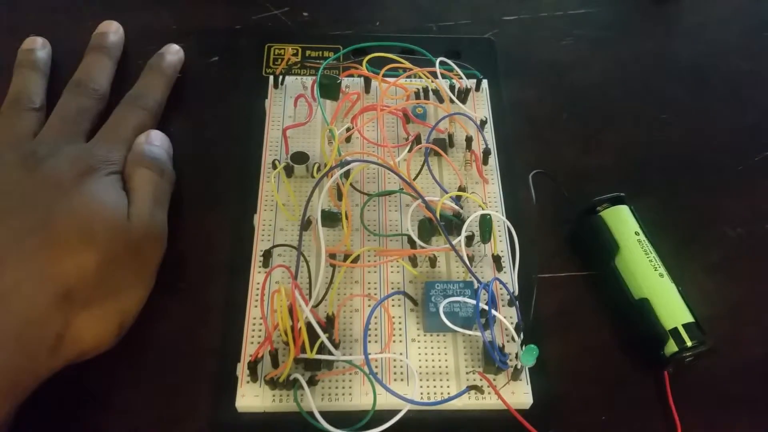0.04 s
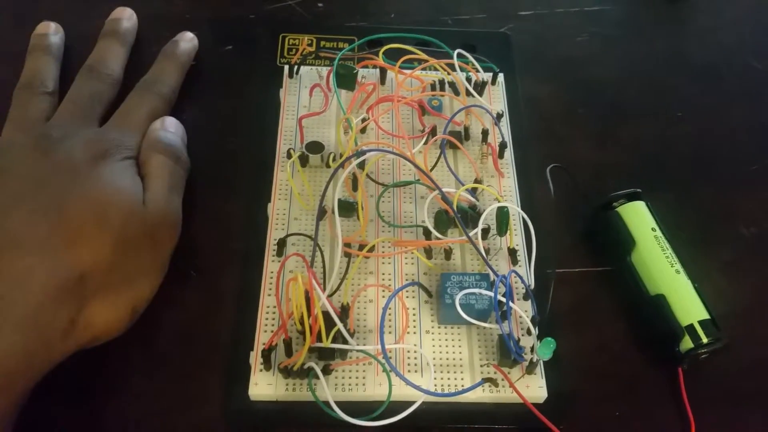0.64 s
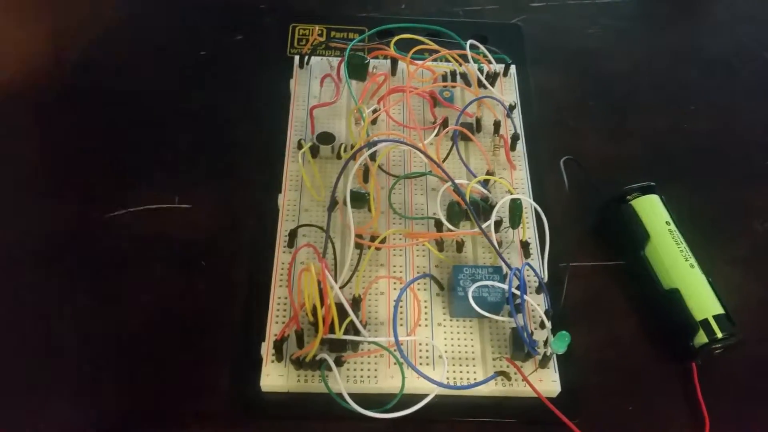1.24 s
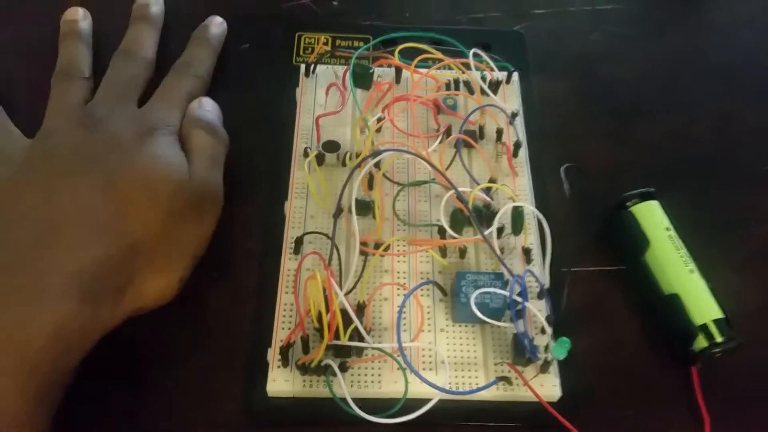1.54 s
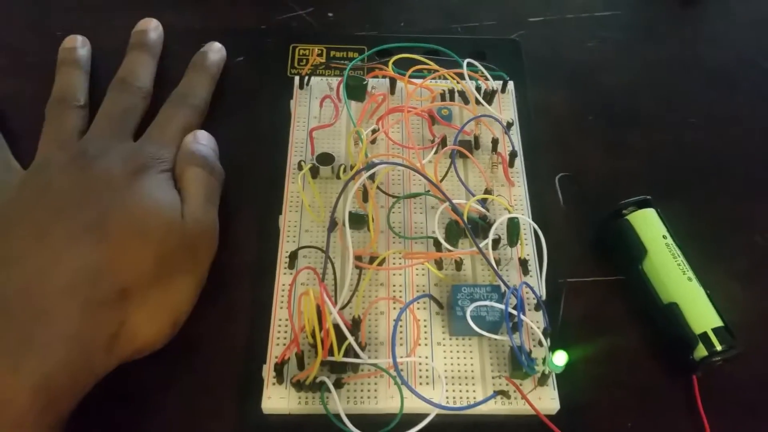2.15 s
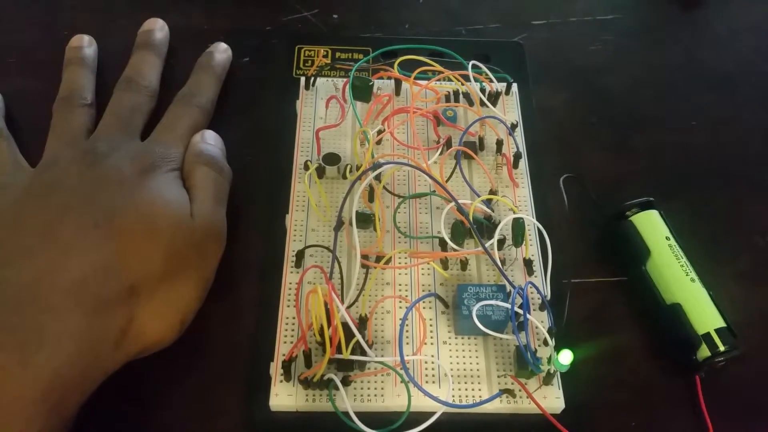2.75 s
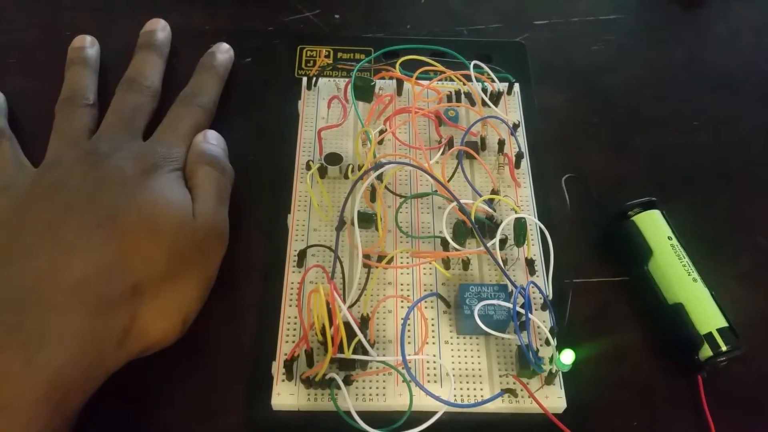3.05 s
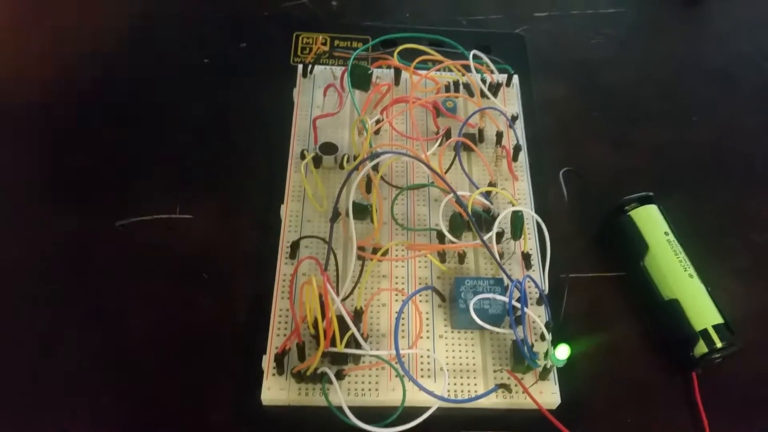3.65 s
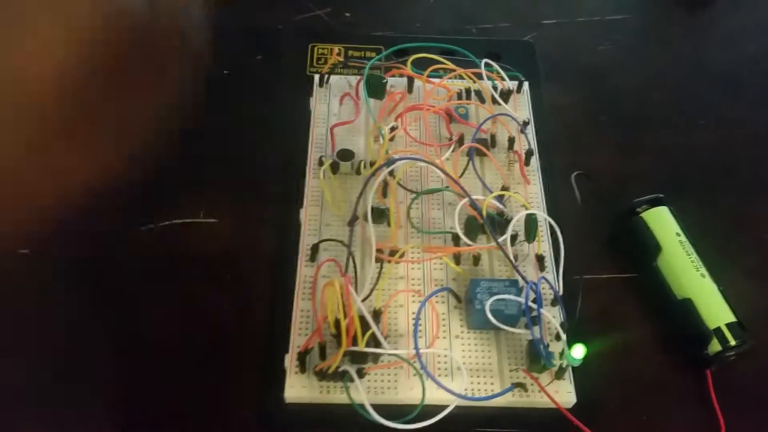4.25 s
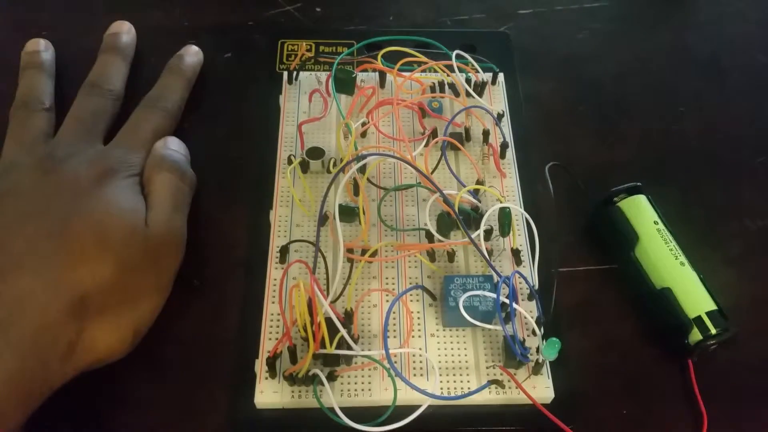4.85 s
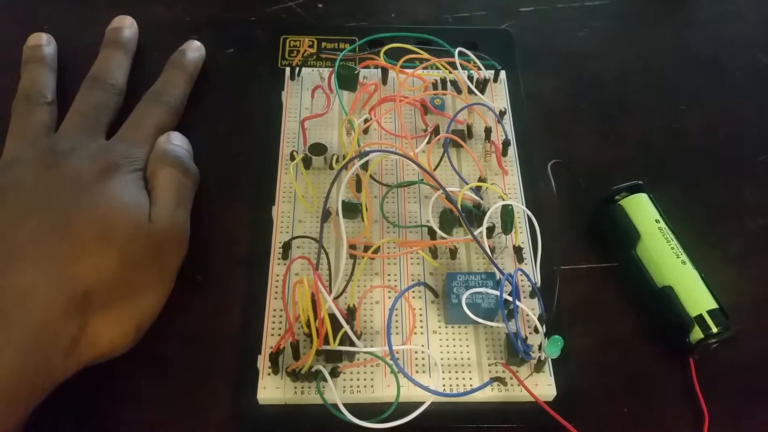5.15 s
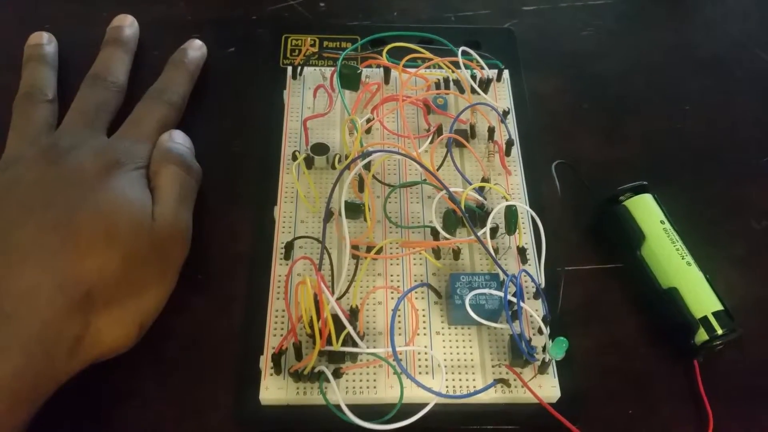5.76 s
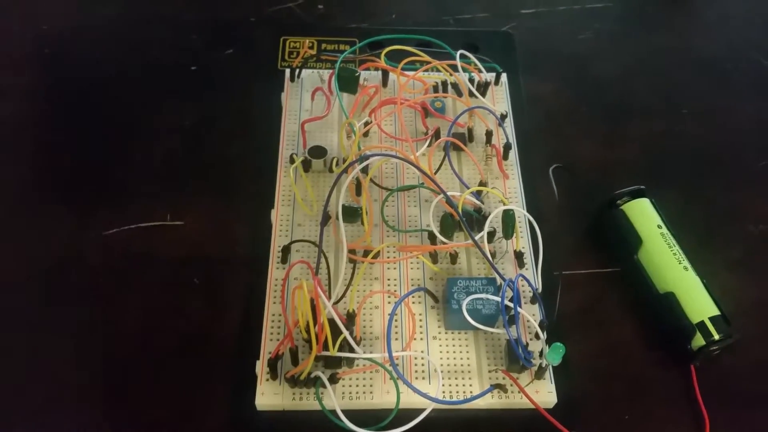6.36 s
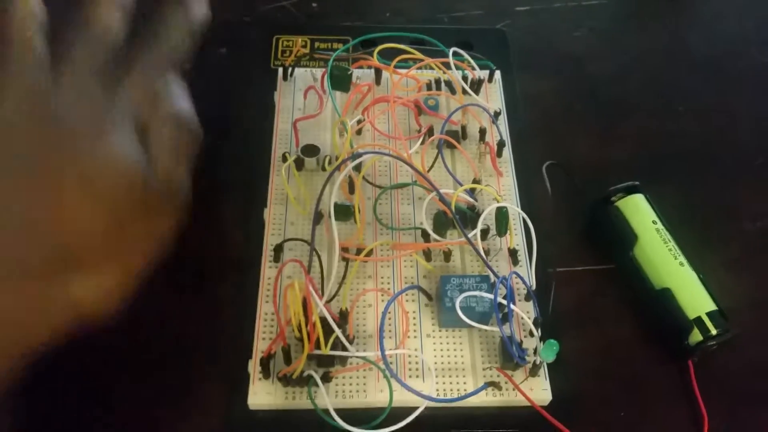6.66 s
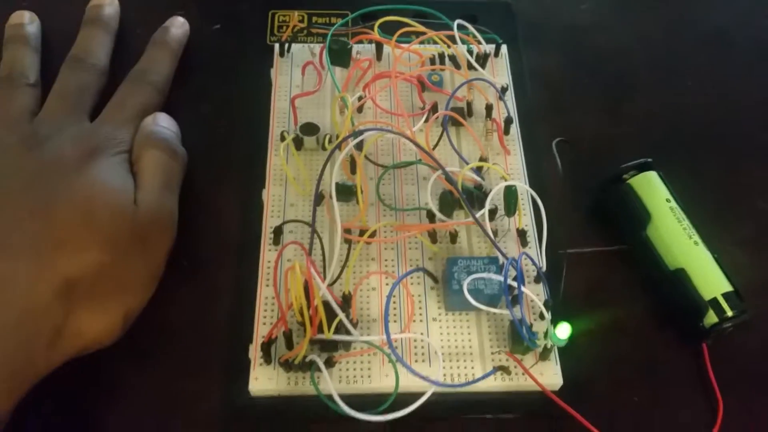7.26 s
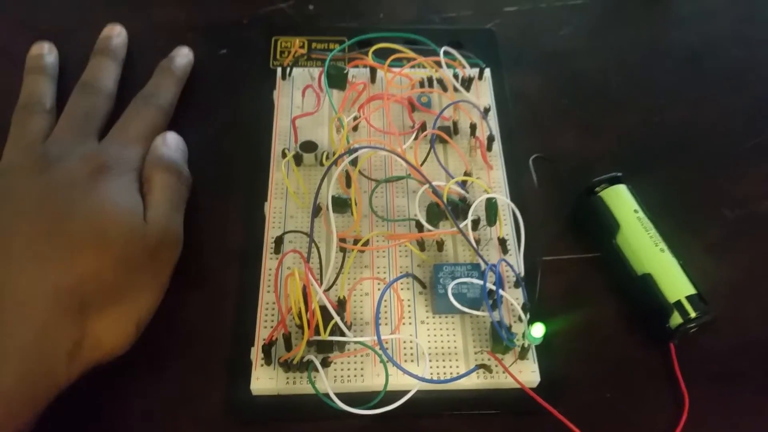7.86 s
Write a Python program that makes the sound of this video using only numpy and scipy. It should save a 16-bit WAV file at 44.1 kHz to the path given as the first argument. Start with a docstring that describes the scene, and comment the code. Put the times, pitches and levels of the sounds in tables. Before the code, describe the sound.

Faint room rumble and hiss open the scene, with soft touches of a hand on wood around 1 second. A slight sleeve swish leads into a loud flat-handed slap on a wooden table at 1.5 seconds, and another at 2. Further pairs land at 4 and 4.5 seconds, then at 6.6 and 7, the second of each a little weaker. Every slap is a close crack with a low thump, slightly left, ringing through the table and hard room for about half a second. Right after each, a loose circuit board and battery knock back down in a quick clatter. The background dips after the slaps and slowly returns. The hand shifts very softly around 3.3, 3.9, 5.1, 6 and 7.7 seconds, and a few tiny dry ticks come near 8 seconds.

```python
"""Three pairs of flat-handed claps on a wooden table that carries a small circuit, in a hard, echoing room.
The heel of the hand thumps the top, the palm shuts with a crack, and table and room ring on.
Each clap makes the loose board and battery hop and knock back down; the hand shifts softly in between.
A limiter flattens the claps, and a slow gain control ducks the room's rumble, hiss and faint hums,
then lets them creep back."""
import sys
import numpy as np
from scipy import signal
from scipy.fft import rfft, irfft, next_fast_len
from scipy.io import wavfile
from scipy.ndimage import uniform_filter1d, minimum_filter1d

SR = 44100
rng = np.random.default_rng(int(sys.argv[2]) if len(sys.argv) > 2 else 0)


def log_audio(samples):
    """Write samples as a 16-bit WAV file to the path given in sys.argv[1]."""
    # one column per channel
    frames = np.atleast_2d(samples).T
    # limit to full scale, then quantise
    limited = np.clip(frames, -1, 1)
    pcm = np.round(limited * 32767).astype(np.int16)
    wavfile.write(sys.argv[1], SR, pcm)


N = 353417

# The claps, each with its own weight and EQ:
# (time [s], force [dB], bass [dB], mids [dB], top [dB], board's air time [s], landing level [dB])
CLAP_HITS = [(1.5022, 6.5, 1.8, 2.5, 3, .0485, 5.5), (1.955, 5.5, -4, -0.3, -6, 0.051, -3),
             (4.0479, 6, 0, 0.8, -1.5, 0.054, 6), (4.5190, 3, -2, 0.4, -5, .055, -2.5),
             (6.5581, 6, 2.5, 0.7, 0, .053, 5.5), (7.0213, 1.6, .3, -1.5, 1.5, 0.063, -6.5)]


def claps():
    """The hand strikes the table, and every blow throws the loose parts into a short hop."""
    out, room = np.zeros((2, N)), reverberation(ROOM_TAIL_EQ)
    for time, force_db, bass_db, mids_db, top_db, air_s, landing_db in CLAP_HITS:
        eq = [(150, bass_db), (800, mids_db), (3200, -0.6), (8000, top_db)]
        add(out, time, gain_of(force_db) * coloured(clap(room), eq))
        for delay, db in hops(air_s):
            add(out, time + delay, gain_of(landing_db + db) * landing())
    return out


# Slapback off walls and ceiling: (delay [s], level [dB])
SLAPBACKS = [(0.0136, -6.5), (0.0216, -24.5)]


def clap(room, shared=0.65, right_lag_s=.00034):
    """One blow with its ring and echoes; landing near the same spot, claps share part of their tail."""
    direct = hand_strike()
    tail = shared * room + np.sqrt(1 - shared ** 2) * reverberation(ROOM_TAIL_EQ)
    out = gain_of(-0.68) * tail + table_ring()
    # the hand is on the left, so its sound reaches the right side later
    add(out, 0, np.array([direct[0], np.roll(direct[1], round(right_lag_s * SR))]))
    reflected = coloured(direct, [(150, -1), (900, -6), (2000, -5), (3400, 1.5), (5000, -9), (8000, -11.5)])
    for delay, db in SLAPBACKS:
        add(out, delay, gain_of(db) * reflected)
    return palm_hollow(out)


# Crack of skin on wood, full in the mids: (frequency [Hz], level [dB])
CRACK_EQ = [(60, -12.5), (200, -5), (480, 6.5), (750, -2.5), (1200, -1), (2200, -6.5), (2800, -2.5),
            (3500, -4.5), (4200, -13.5), (5400, -17.5), (6800, -31.5), (11000, -31.5), (16000, -36.5)]


def hand_strike(palm_delay_s=.0032):
    """The heel lands with a thump and a dull slap, then the palm shuts with a louder crack."""
    out = np.zeros((2, SR // 5))
    add(out, 0, gain_of(11.5) * table_flex(hz=160, rise=0.00049, decay=0.0053))
    heel = burst(CRACK_EQ, decay=0.0028, rise=0.00031)
    add(out, 0, gain_of(1) * coloured(heel, [(1000, 5), (3000, -2.5), (8000, -6)]))
    add(out, palm_delay_s, gain_of(8) * burst(CRACK_EQ, decay=0.0018, rise=0.00017))
    return out


def palm_hollow(x, bands=26):
    """The hollow under the hand is shaped anew each time, lifting and dipping bands at random."""
    hz = np.geomspace(400, 4500, bands)
    ripple_db = rng.uniform(-2.5, 2.5, bands) * signal.windows.tukey(bands, .2)
    return coloured(x, np.column_stack([hz, ripple_db]))


def table_flex(hz, rise, decay):
    """The table top gives under a blow and swings back."""
    t = np.arange(SR // 10) / SR
    swing = -np.sin(2 * np.pi * hz * t) * (1 - np.exp(-t / rise)) * np.exp(-t / decay)
    return np.array([swing, swing])


# Low boom of the table and the room around it: (frequency [Hz], level [dB], T60 [s])
BOOM_MODES = [(73.2, -12, 0.42), (89.5, -10.5, 0.55), (114, -8.5, 0.38), (126.6, 0.5, .32),
              (174.2, -13, 0.51), (211, -6, 0.36), (287.5, -9, 0.46), (336.5, -10, 0.56), (369.7, -12, .33),
              (449, -14, 0.11), (578, -14.5, .33)]


def table_ring(build_s=0.0058):
    """The low modes swell after a blow; each landing spot favours them a little differently."""
    t = np.arange(SR) / SR
    hz, db, t60 = np.transpose(BOOM_MODES)[:, :, None]
    spot_db = 1.5 * rng.standard_normal(hz.shape)
    t60 = np.minimum(t60, curve_at(ROOM_DECAY, hz))  # no mode outlasts the room
    fades = gain_of(db + spot_db - 60 * t / t60)
    ring = (fades * np.sin(2 * np.pi * hz * t)).sum(0)
    return np.array([ring, ring]) * (1 - np.exp(-(t / build_s) ** 2))


def hops(air_s, battery_air_s=.0622, rebound=.93):
    """Board and battery come down, and the board takes a second, shorter hop: (delay [s], level [dB])."""
    return [(air_s, 0), (battery_air_s, -0.15), (air_s * (1 + rebound), -4.5)]


# Clack of a loose part on wood: (frequency [Hz], level [dB])
KNOCK_EQ = [(70, -18), (150, -2), (350, 5.5), (1200, -2), (2800, -7.5), (4400, -16.5), (6300, -43),
            (15000, -48.5)]


def landing():
    """A falling part knocks and nudges the table top; table and room ring on, with one slapback."""
    knock = gain_of(-2) * burst(KNOCK_EQ, decay=0.0034, rise=0.0018)
    add(knock, 0, gain_of(1) * table_flex(hz=227, rise=0.001, decay=0.0035))
    out = gain_of(-27) * reverberation(KNOCK_EQ) + gain_of(-17) * table_ring()
    add(out, 0, knock)
    add(out, SLAPBACKS[0][0], gain_of(-11.5) * knock)
    return out


# Muffled pat of skin on wood: (frequency [Hz], level [dB])
TOUCH_EQ = [(40, -15), (170, 0), (400, -2.5), (800, -7.5), (1500, -13.5), (4000, -25.5), (6500, -44.5),
            (15000, -60)]
# The hand shifts and lifts off: (time [s], level [dB], treble [dB], decay [s])
HAND_MOVES = [(0.864, -45.5, 2, 0.012), (0.884, -48, 5.5, 0.005), (.993, -43, -1, 0.031),
              (1.065, -55.5, 6.5, .012), (3.316, -45.5, -11, 0.014), (3.52, -65, 11.5, .012),
              (3.851, -49, -14.5, 0.026), (5.078, -45.5, -4.5, 0.015), (5.977, -47.5, -7, 0.03),
              (7.659, -46, -1.5, 0.015), (7.7, -54.5, -3.5, 0.11), (7.925, -55.5, 6, 0.095)]


def touches():
    """Soft touches of the hand faintly stir the table and the room."""
    out = np.zeros((2, N))
    for time, db, treble_db, decay in HAND_MOVES:
        touch = gain_of(-12.5) * reverberation(TOUCH_EQ) + gain_of(-12) * table_ring()
        add(touch, 0, burst(TOUCH_EQ, decay))
        add(out, time, gain_of(db) * coloured(touch, [(500, 0.014), (2500, treble_db)]))
    return out


# Small dry ticks: (time [s], level [dB], pitch [Hz])
DRY_TICKS = [(.867, -55, 3700), (7.964, -42.5, 3290), (7.980, -45, 3300), (7.994, -45.5, 2290)]


def ticks():
    """Tiny clicks of noise, each peaking at its own pitch."""
    out = np.zeros((2, N))
    for time, db, hz in DRY_TICKS:
        eq = [(hz / 2, -14), (hz, 0), (4400, -9), (6500, -24)]
        add(out, time, gain_of(db) * burst(eq, decay=0.0017))
    return out


# Soft whoosh of cloth: (frequency [Hz], level [dB])
SLEEVE_EQ = [(100, 2), (600, 0.5), (2800, -3), (4500, -11.5), (6500, -27), (12000, -24.5), (16000, -26)]
# Two thin strands of whistle: (time [s], length [s], level [dB], pitch [Hz], rise [oct], arch [oct])
WHISTLE_STRANDS = [(1.412, .095, -75.5, 13320, -.07, .1), (1.414, .06, -70, 11440, .11, 0.082)]


def downswing():
    """The sleeve swishes on the way to the first clap, with a thin whistle riding on top."""
    out = np.zeros((2, N))
    swish = diffuse(SLEEVE_EQ, count=8192)
    add(out, 1.36, gain_of(-53) * swish * np.hanning(swish.shape[1]))
    for time, *strand in WHISTLE_STRANDS:
        add(out, time, fuzzy_tone(*strand, half_width_hz=46))
    return out


# Dark tail the room gives a clap: (frequency [Hz], level [dB])
ROOM_TAIL_EQ = [(25, -20.5), (52, -11), (80, -4), (115, 0), (160, -2.5), (320, -0.5), (570, -4.5),
                (720, -10), (950, -10), (1250, -14), (1700, -12.5), (3300, -20.5), (4500, -28.5),
                (5500, -39.5), (6600, -49.5), (10500, -49.5), (15500, -57)]
# Reverb time across the spectrum: (frequency [Hz], T60 [s])
ROOM_DECAY = [(60, 0.53), (160, .44), (420, 0.39), (1100, 0.49), (2900, 0.5), (5000, 0.46), (12000, 0.39)]


def reverberation(eq, build_s=0.004):
    """The room's answer builds up quickly, then each band dies at its own speed."""
    hz, t, bands = signal.stft(diffuse(eq, SR), SR, nperseg=256)
    fades = gain_of(-60 * t / curve_at(ROOM_DECAY, hz)[:, None])
    tail = signal.istft(bands * fades, SR, nperseg=256)[1][:, :SR]
    return tail * (1 - np.exp(-np.arange(SR) / SR / build_s))


# Bed of rumble and hiss: (frequency [Hz], level [dB])
ROOM_TONE_EQ = [(20, -14), (60, 0.5), (100, -1), (200, -10), (310, -11.5), (430, -23), (950, -18.5),
                (1700, -26.5), (3900, -37), (4700, -27), (5300, -30), (6200, -45), (12000, -38.5),
                (16000, -39.5)]
# Faint far-off hums: (time [s], length [s], level [dB], pitch [Hz], rise [oct], arch [oct])
FAR_HUMS = [(1.13, 0.25, -64.5, 507, .02, 0.013), (3.28, .32, -60, 360, .04, .03),
            (3.18, 0.59, -61, 312, -.02, 0.011), (6.168, 0.23, -73, 1090, 0.55, 0.058)]


def room_tone():
    """Steady rumble and hiss, with narrow hums drifting through."""
    out = gain_of(-56.5) * diffuse(ROOM_TONE_EQ, next_fast_len(N))[:, :N]
    for time, *hum in FAR_HUMS:
        add(out, time, fuzzy_tone(*hum, half_width_hz=20.4))
    return out


def fuzzy_tone(length, db, hz, rise, arch, half_width_hz, swell=.7):
    """A narrow band of noise swells and fades while its pitch glides along an arch."""
    position = np.linspace(-1, 1, round(length * SR))
    pitch = hz * 2 ** (rise * position / 2 - arch * position ** 2)
    lowpass = signal.butter(2, half_width_hz, fs=SR, output="sos")
    real, imag = signal.sosfilt(lowpass, rng.standard_normal((2, len(position))))
    carrier = np.exp(2j * np.pi * np.cumsum(pitch) / SR)
    band = unit_rms(((real + 1j * imag) * carrier).real)
    tone = gain_of(db) * band * (1 - position ** 2) ** swell
    return np.array([tone, tone])


def burst(eq, decay, rise=0.000067, count=8192):
    """A dying puff of coloured noise, starting near rms 1; decay and rise are in seconds."""
    t = np.arange(count) / SR
    fade = (1 - np.exp(-t / rise)) * np.exp(-t / decay)
    white = diffuse([(20, 0), (20000, 0)], count)
    return unit_rms(coloured(white * fade, eq)) * np.sqrt(np.mean(fade ** 2)) / fade.max()


def diffuse(eq, count, mic_spacing_m=.18):
    """Noise from all sides: alike left and right in the bass, unrelated in the treble."""
    hz = np.fft.rfftfreq(count, 1 / SR)
    left, unrelated = rfft(rng.standard_normal((2, count)))
    coherence = .96 * np.sinc(2 * hz * mic_spacing_m / 343)
    right = coherence * left + np.sqrt(1 - coherence ** 2) * unrelated
    return unit_rms(irfft(np.array([left, right]) * gain_of(curve_at(eq, hz)), count))


def coloured(x, eq, size=4096):
    """Minimum-phase EQ through points of (frequency [Hz], level [dB])."""
    log_gain = np.log(gain_of(curve_at(eq, abs(np.fft.fftfreq(size, 1 / SR)))))
    taps = np.fft.ifft(np.exp(np.conj(signal.hilbert(log_gain)))).real
    return signal.fftconvolve(x, taps[None, :size // 2], axes=1)[:, :x.shape[1]]


def curve_at(points, hz):
    """Joins points by straight lines on a log-frequency axis."""
    point_hz, value = np.transpose(points)
    return np.interp(np.log(hz + 1), np.log(point_hz + 1), value)


def gain_of(db):
    """Decibels to amplitude."""
    return 10 ** (np.asarray(db) / 20)


def unit_rms(x):
    """Scales to rms 1."""
    return x / np.sqrt(np.mean(x ** 2) + 1e-20)


def add(mix, time, sound):
    """Mixes a stereo sound in at a time in seconds."""
    part = mix[:, max(round(time * SR), 0):][:, :sound.shape[1]]
    part += sound[:, :part.shape[1]]


# Pan to the hand's side, added on the left and taken off the right: (frequency [Hz], level [dB])
HAND_PAN = [(120, 1), (500, 0.9), (1100, 2.08), (3000, 2.5), (8000, 2.5), (13000, 3.5)]


def scene():
    """Hand and table sit to the left, over room tone that leans slightly the same way."""
    left, right = claps() + touches() + ticks() + downswing()
    left = coloured(left[None], HAND_PAN)
    right = coloured(right[None], [(hz, -db) for hz, db in HAND_PAN])
    return np.vstack([left, right]) + room_tone() * gain_of([[.9], [-.9]])


def level_db(x, window_s=0.0037):
    """Short-term power of both channels."""
    power = uniform_filter1d((x ** 2).mean(0), round(window_s * SR))
    return 10 * np.log10(abs(power) + 1e-12)


def released(cut_db, db_per_s):
    """A gain cut that sets in at once and lets go at a steady speed."""
    ramp = np.arange(N) / SR * db_per_s
    return uniform_filter1d(np.maximum.accumulate(cut_db + ramp) - ramp, size=64)


def gain_control(x, threshold_db=-18, depth_db=14, hold_s=0.68, start_db=11, opening_s=1.13):
    """Loud sound turns the gain down; it waits, then creeps back. It starts partly turned down."""
    cut_db = np.clip(2 * (level_db(x) - threshold_db), 0, depth_db)
    half = round(hold_s * SR / 2)
    held_db = -minimum_filter1d(-cut_db, 2 * half + 1, origin=half)
    opening_db = start_db * np.maximum(1 - np.arange(N) / SR / opening_s, 0)
    return x / gain_of(np.maximum(released(held_db, db_per_s=21.5), opening_db))


def limiter(x, ceiling_db=-8.0, ahead_s=0.0039):
    """Looks a little ahead, ducks the peak, and lets go about as fast as the room dies away."""
    over_db = np.maximum(level_db(x) - ceiling_db, 0)
    cut_db = -minimum_filter1d(-over_db, 2 * round(ahead_s * SR) + 1)
    return x / gain_of(released(cut_db, db_per_s=97.5))


def record(dry, low_cut_hz=42, high_cut_hz=16300):
    """Slow gain control, a fast limiter, a rumble filter, a soft overload and a steep high cut."""
    x = limiter(gain_control(dry))
    x = signal.sosfilt(signal.butter(1, low_cut_hz, "high", fs=SR, output="sos"), x)
    x = x / (1 + x ** 8) ** (1 / 8)  # rounds off the peaks
    high_cut = signal.firwin(511, high_cut_hz, window=("kaiser", 9), fs=SR)
    return signal.oaconvolve(x, high_cut[None], "same")


dry = scene()
out = record(dry)
log_audio(out)
```